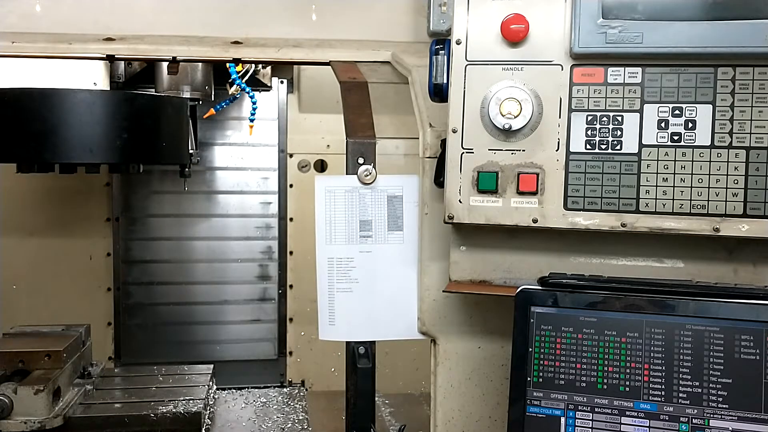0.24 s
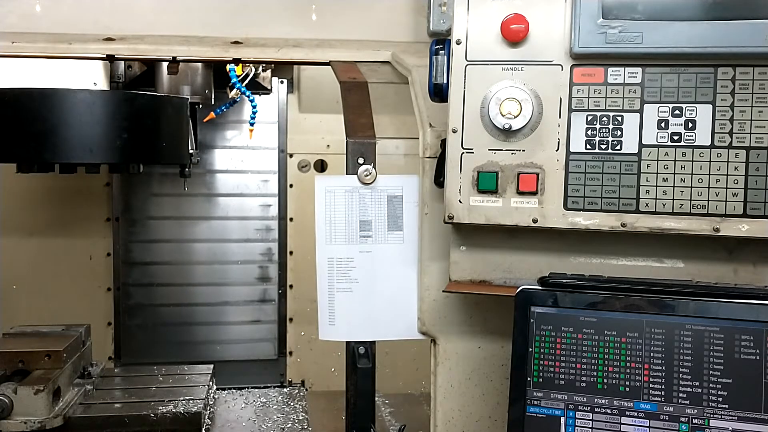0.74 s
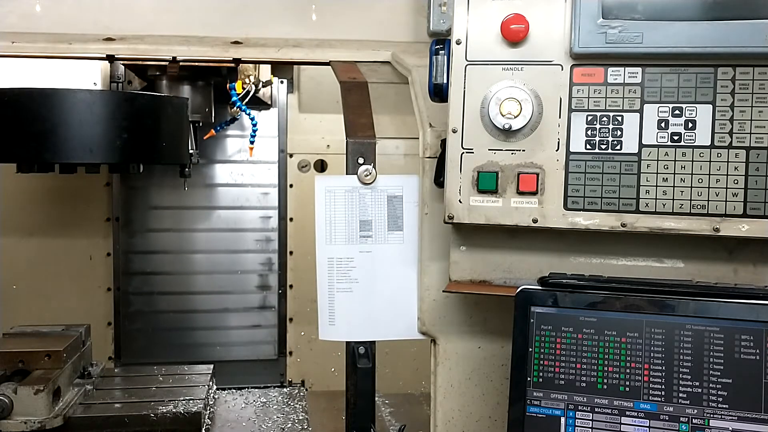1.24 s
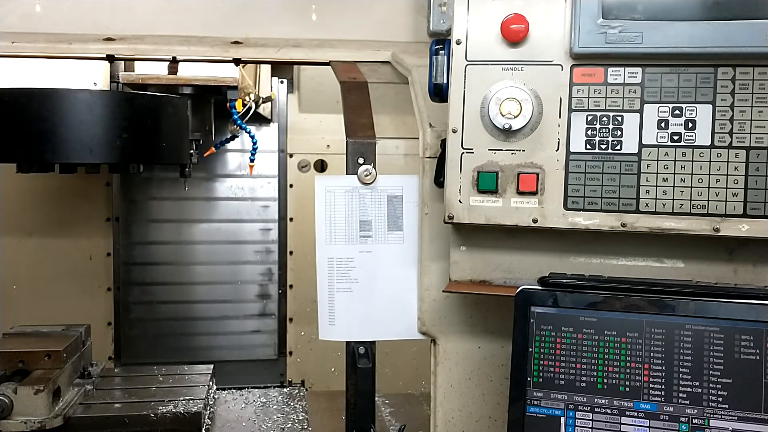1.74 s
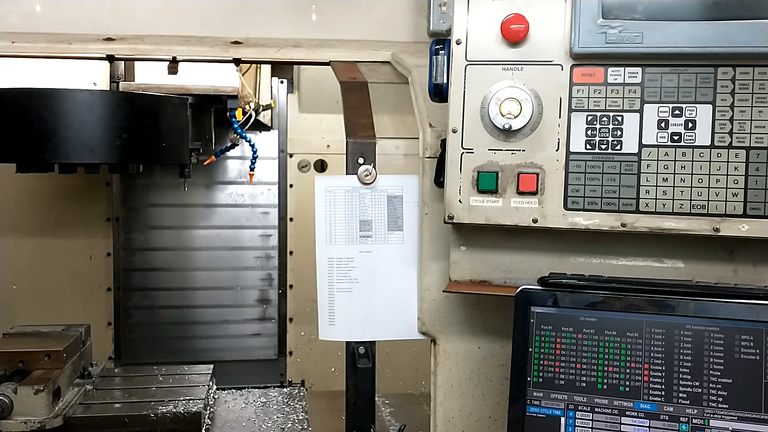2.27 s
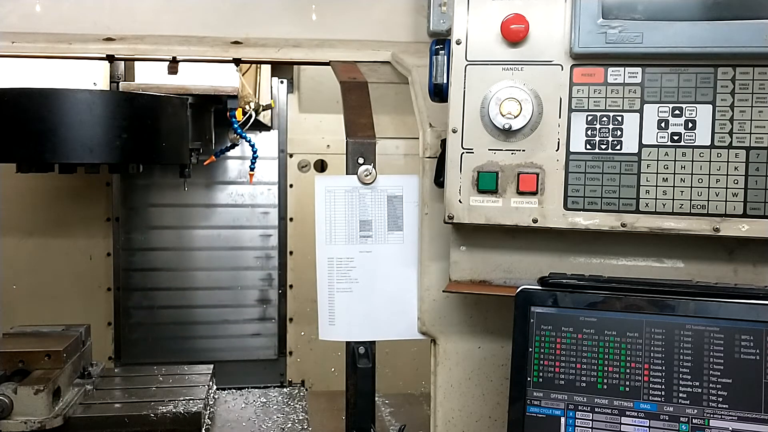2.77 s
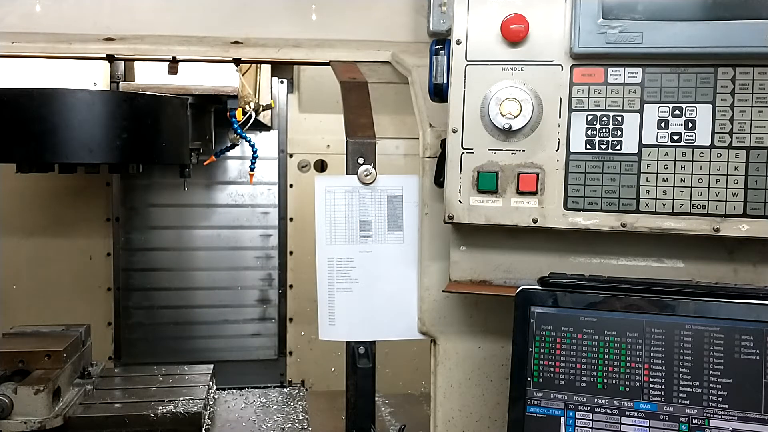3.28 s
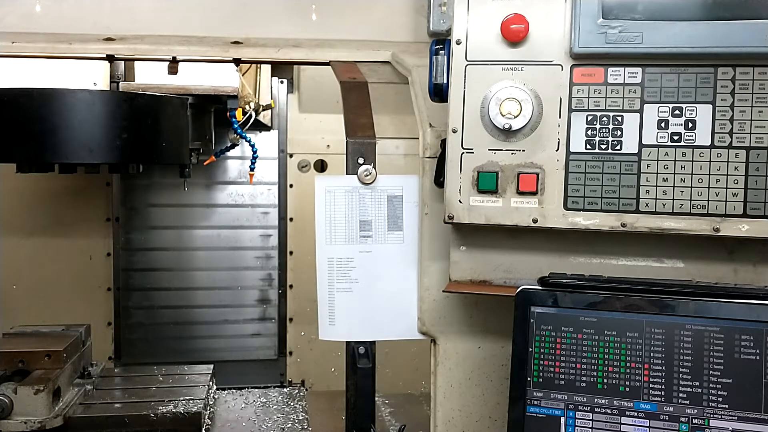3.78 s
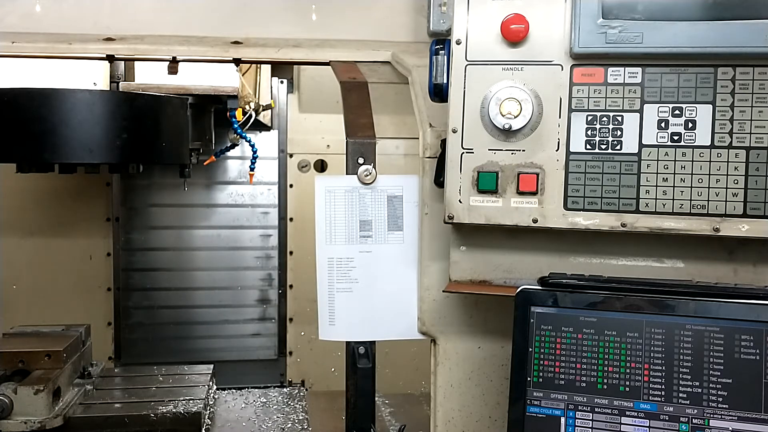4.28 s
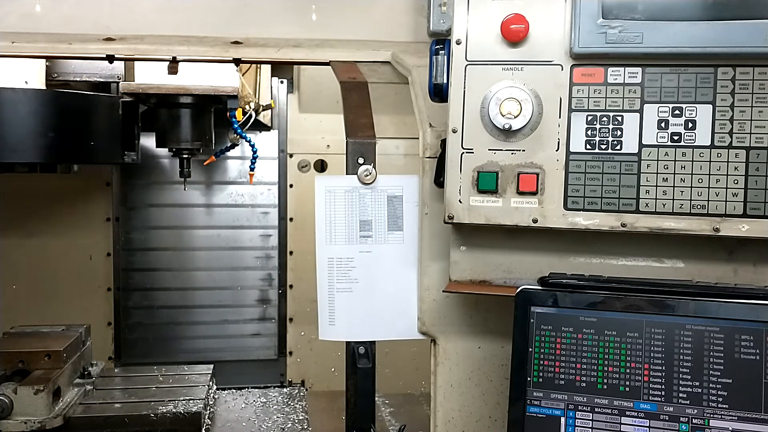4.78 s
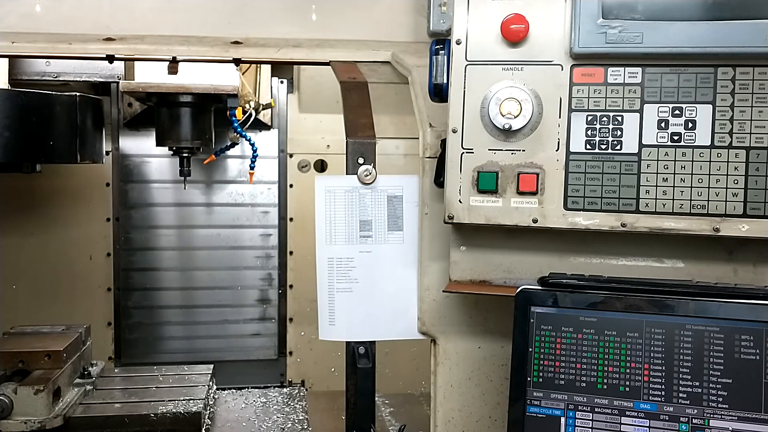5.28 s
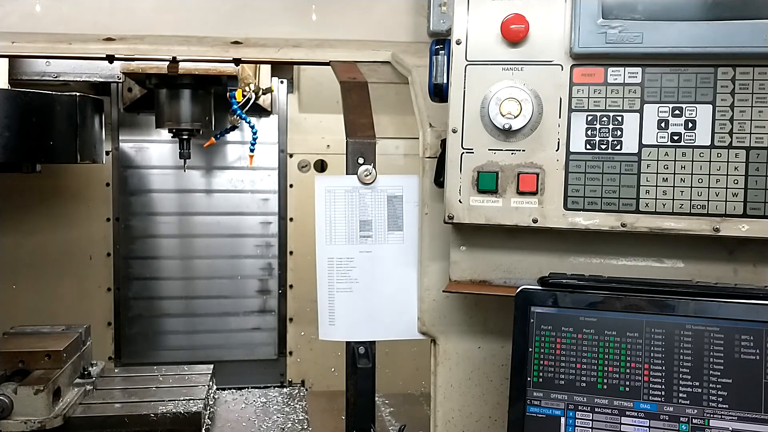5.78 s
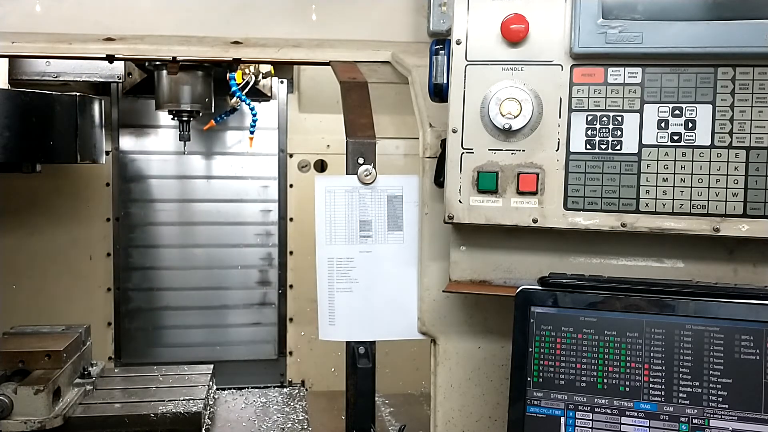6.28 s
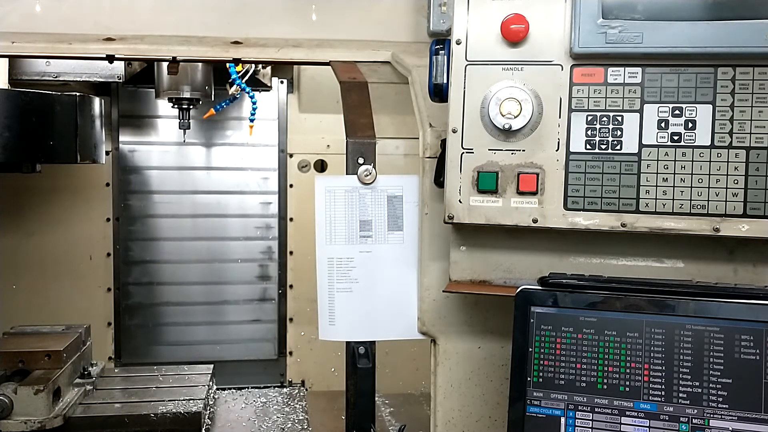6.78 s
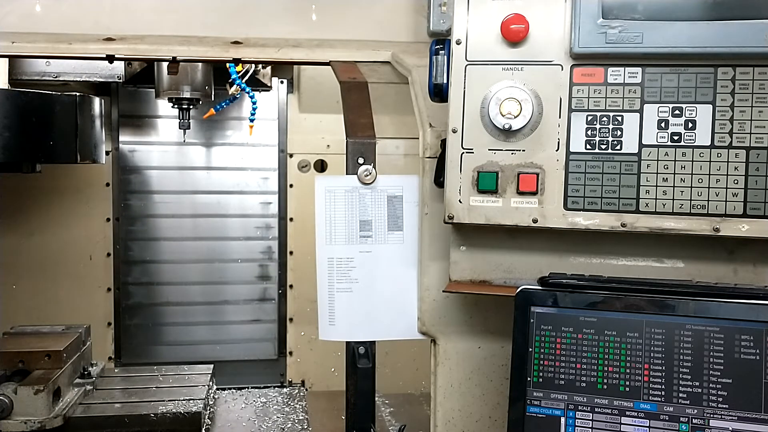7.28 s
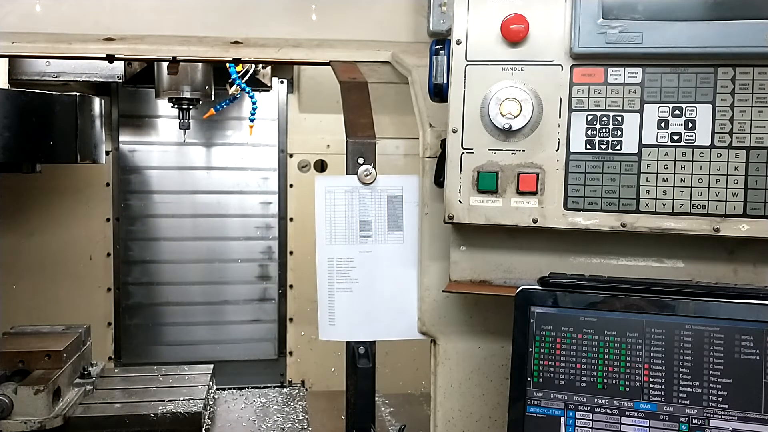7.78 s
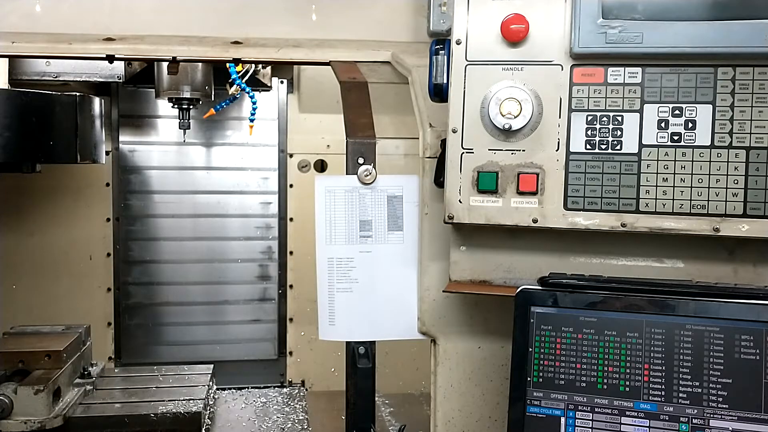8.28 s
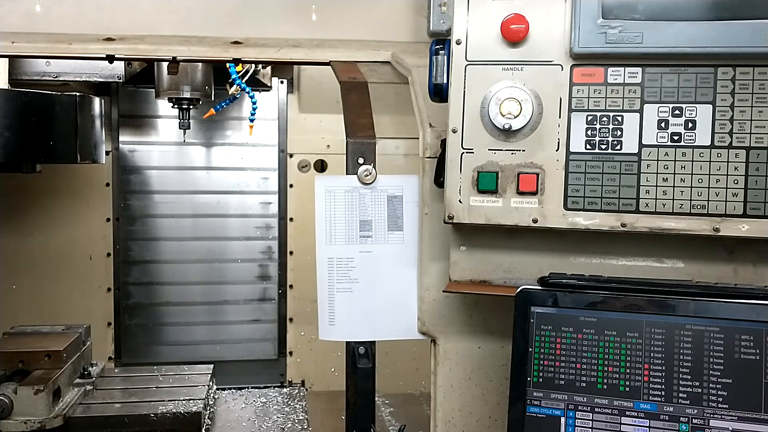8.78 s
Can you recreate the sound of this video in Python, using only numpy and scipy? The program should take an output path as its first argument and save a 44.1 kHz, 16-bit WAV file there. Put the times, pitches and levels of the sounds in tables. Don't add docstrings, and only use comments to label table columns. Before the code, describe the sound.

A machining centre changes its tool, heard by a small stereo microphone in front of its sheet-metal enclosure. From 0 s a very loud, bright, ringing blast of compressed air roars steadily, covering a faint groan of the descending head. Around 1.5-2 s it pinches into wavering whistles, ending in a very high squeal at about 1.95 s. Heavy knocks fall at 2.0-2.3 s, the strongest at 2.24 s with a sharp venting hiss that fades by 3 s. Steady fan and mains hum with soft airy hiss remains. From 4.35 s a carousel rumbles back with faint hiss and a thin reedy singing that rises slightly; a rail bump at 4.85 s, then hard panel clanks and air puffs at 5.1-5.3 s. The head groans and scrapes from 5.3 to 6.8 s, a short bright air puff comes at 6.9 s, then only hum.

```python
import sys
import numpy as np
from scipy import signal
from scipy.fft import rfft, irfft, next_fast_len
from scipy.io import wavfile
from scipy.ndimage import uniform_filter1d, map_coordinates

SR = 44100
rng = np.random.default_rng(int(sys.argv[2]) if len(sys.argv) > 2 else 0)


def master_out(mix):
    frames = np.transpose(np.atleast_2d(mix))
    ceiling = np.clip(frames, -1, 1)
    pcm = np.round(ceiling * 32767).astype(np.int16)
    wavfile.write(sys.argv[1], SR, pcm)


def voltage_ratio(decibels):
    exponent = np.asarray(decibels, float) / 20
    return 10 ** exponent


N = 398220
SIZE = 8 * next_fast_len(N // 8 + 2048)
HZ = np.fft.rfftfreq(SIZE, 1 / SR) + 1e-3
TIME = np.arange(N) / SR

# rise_s, bend of the fade
SURGE = (0.022, 0.5)


def spindle_air():
    # pitch_hz, level_db (per Hz)
    blast_air = [(290, -67), (500, -37), (667, -30), (782, -22), (916, -11), (1310, -10.5), (2030, -10.5),
                 (2450, -10), (2700, -6.5), (3120, -6), (4810, -6.5), (6610, -10.5), (7800, -7.5),
                 (9340, -6), (10700, -7), (11800, -12.5), (13600, -13), (14600, -7), (15100, -12),
                 (15700, -34.5)]
    closing_air = [(290, -54), (500, -24), (603, -24), (677, -9), (1110, -10), (1450, -1.5), (2480, -14.5),
                   (2820, -1.5), (3400, -18.5), (4700, -17), (5480, -6), (6700, -12.5), (11400, -4),
                   (12500, -2), (15700, -6)]
    # pitch_hz, width_hz, level_db
    taper = [(1070, 60, -30), (2582, 23, 3), (2733, 22, 7), (2850, 29, -9.5), (2940, 16, 3), (3460, 22, 5),
             (3565, 25, 4), (3680, 25, 3.5), (4170, 57, -8), (4370, 18, -5.5), (4780, 120, -4.5),
             (8400, 200, -10), (9250, 60, -8), (9460, 200, -11)]
    # start_s, held_s, level_db, fade_s (by 20 dB), extra_brightness_db
    blast_openings = [
        (0.0, 0.27, -24.5, 0.5, 0),
        (0.001, 1.76, -18, 0.0851, -0.5),
        (1.6, 0.16, -43, -0.1851, 14),
    ]
    closing_openings = [
        (1.77, 0.045, -26, 0.11, -0.5),
        (1.86, 0.048, -28.5, 0.0428, 8.5),
        (1.92, 0.07, -33, 0.1349, 2),
        (2.04, 0.039, -57, 0.25, 6),
    ]
    # start_s, pitch_hz, level_db
    gap_low = [(1.15, 934, -42), (1.45, 944, -35.5), (1.58, 904, -35), (1.68, 860, -40.5),
               (1.9, 813, -44.5)]
    gap_mid = [(1.55, 6130, -29), (1.714, 5870, -16), (1.8, 5530, -32.5), (2.15, 5310, -50)]
    gap_high = [(1.72, 13500, -45), (1.76, 13500, -29), (1.846, 13500, -40), (1.886, 13700, -21),
                (1.9, 13700, -33.5)]
    gap_shut = [(1.925, 12800, -30), (1.945, 12700, -10.5), (1.975, 12750, -15.5), (2.03, 12800, -25),
                (2.07, 12690, -38), (2.2, 12697, -68)]

    colour = voltage_ratio(over_hz(blast_air[:-1] + [(16000, -11.0)])) * (1 + 1.83 * peaks(taper))
    blast = jet(blast_openings, "blast", colour, spread=0.65)

    echo_db, echo_lag_s, descent_from_s, shrink_per_s = -15, 0.0007, 0.66, 0.5
    end = 2 * SR
    descent_s = np.maximum(TIME[:end] - descent_from_s, 0)
    late = (TIME[:end] - echo_lag_s * np.exp(-shrink_per_s * descent_s)) * SR
    echo = np.array([map_coordinates(port[:end], [late], mode="mirror") for port in blast])
    blast[:, :end] += voltage_ratio(echo_db) * echo

    closing = jet(closing_openings, "closing", voltage_ratio(over_hz(closing_air)), spread=0.76)
    whistles = whistle(gap_low, 110, 1.3) + whistle(gap_mid, 450, -2.5)
    whistles += whistle(gap_high, 237, -4) + whistle(gap_shut, 180, -2.5)
    return blast + closing + whistles


def vents():
    # pitch_hz, level_db (per Hz)
    clamp_air = [(290, -41), (500, -11), (658, 16), (782, -9), (865, -7), (1030, -12), (1410, -5),
                 (1680, -12), (2240, -0.5), (3400, -7), (4000, 1.5), (5600, -0.5), (7100, 3.5), (9610, 3.5),
                 (11000, -5), (15700, -13)]
    last_air = [(290, -41), (500, -15.5), (840, -21), (1280, -18), (1660, 1), (1860, -14), (2950, -10.5),
                (3210, -20), (3660, -10), (6150, -18), (8320, -7.5), (10000, -13.5), (15700, -24)]
    # start_s, held_s, level_db, fade_s (by 20 dB), extra_brightness_db
    clamp_openings = [
        (2.236, 0.049, -32.5, 0.21, -1.5),
        (2.238, 0.013, -33, 0.09, 6),
        (2.42, 0.12, -55, 0.43, 5.5),
    ]
    last_openings = [
        (4.585, 0.008, -49.5, 0.23, -2),
        (6.857, 0.031, -51.5, 0.11, 14.5),
        (6.897, 0.017, -39, 0.12, 1.5),
        (6.95, 0.014, -67, 0.5, 10),
    ]
    # start_s, pitch_hz, level_db
    clamp_sing = [(2.3, 12400, -52), (2.36, 12350, -37), (2.43, 12250, -38), (2.48, 12300, -52)]

    clamp = jet(clamp_openings, "clamp", voltage_ratio(over_hz(clamp_air)), spread=0.55)
    last = jet(last_openings, "last", voltage_ratio(over_hz(last_air)))
    return clamp + last + whistle(clamp_sing, 400, 0)


def cylinder():
    # pitch_hz, level_db (per Hz)
    stroke_air = [(290, -34), (500, 1), (828, -6.5), (1010, -17), (1780, -10.5), (2900, -4), (3500, -19),
                  (5200, -22), (7210, -5), (14400, -21), (15700, -19)]
    cushion_air = [(290, -31), (500, -1), (697, -7), (793, 0), (957, -19), (1590, -14), (1880, -6.5),
                   (2500, -15), (3030, 1), (3350, -7), (3700, -3), (4200, -20), (5640, -12), (9480, -11),
                   (15700, -41)]
    # start_s, held_s, level_db, fade_s (by 20 dB), extra_brightness_db
    stroke_openings = [
        (4.3, 0.04, -61, 0.1, -4),
        (4.345, 0.05, -55, 0.1, -2),
        (4.4, 0.03, -57, 0.12, 8),
        (4.42, 0.67, -57, 0.1, 2.5),
        (4.586, 0.015, -47, 0.13, 3),
    ]
    cushion_openings = [
        (5.082, 0.03, -41, 0.14, -2),
        (5.16, 0.03, -46, 0.06, 1),
        (5.185, 0.03, -37, 0.17, -2),
    ]
    # start_s, pitch_hz, level_db
    seal = [(4.355, 885, -60), (4.4, 915, -54), (4.47, 931, -55), (4.72, 928, -53), (4.86, 941, -54),
            (5.06, 959, -55), (5.2, 964, -55), (5.29, 962, -63)]
    # multiple of the pitch, level_db
    seal_orders = [(2, -8), (3, -15), (4, -18), (6, -5), (7, -10), (8, 0), (9, -10), (10, 2), (11, -14),
                   (12, -10), (13, -15), (14, -11), (15, -14), (16, -12)]
    # pitch_hz, width_hz, level_db
    barrel = (1915, 60, 13)

    stroke = jet(stroke_openings, "stroke", voltage_ratio(over_hz(stroke_air)))
    cushion = jet(cushion_openings, "cushion", voltage_ratio(over_hz(cushion_air)))

    seal_gain_db, jitter, patchy_db = 3.5, 0.0008, 1.6
    (hz, seal_db), gate = play(seal)
    on, stack = gate > 0, np.zeros((2, N))
    turn = 2 * np.pi * np.cumsum(hz * (1 + jitter * walk(60)))[on] / SR
    barrel_hz, barrel_width_hz, barrel_db = barrel
    lift = voltage_ratio(barrel_db) / np.sqrt(1 + (2 * (2 * hz - barrel_hz) / barrel_width_hz) ** 2)
    port_phase = np.array([[0.5], [-0.5]])
    for order, db in seal_orders:
        size = gate * voltage_ratio(db + seal_db + patchy_db * walk(18))
        if order < 3:
            size = size * lift
        stack[:, on] += size[on] * np.sin(order * turn + 2 * np.pi * rng.random() + port_phase)
    return voltage_ratio(-1.5) * (stroke + cushion) + voltage_ratio(seal_gain_db) * stack


def head():
    # start_s, held_s, level_db, fade_s (by 20 dB)
    screw = [
        (0.66, 1.2, -50, 0.2), (1.87, 0.11, -41.5, 0), (2.07, 0.066, -38.5, 0.4),
        (5.3, 1.35, -44.5, 0.21), (5.45, 0.03, -49, -1.5), (5.6, 0.02, -43, -0.7),
        (6.1, 0.094, -39.5, 0.8), (6.3, 0.06, -51, -0.16), (6.67, 0.019, -42, 0.17),
        (6.77, 0.02, -49, 0.3),
    ]
    slide = [
        (0.6, 1.9, -49.5, 0.8),
        (5.33, 1.28, -45.5, 0.7),
        (5.75, 0.89, -49.5, 0.3),
        (5.9, 0.24, -51, 0.2),
        (6.42, 0.21, -49.5, 0.1),
    ]
    # pitch_hz, width_hz, level_db
    column = [(654, 40, -5), (677, 38, 3), (755, 297.3, -12.5), (836, 28, -3)]
    covers = [(926, 350, -19), (1504, 160, 2), (1678, 32, 9), (1790, 80, -2), (2020, 55, 4),
              (2340, 400, -9), (2690, 300, -7.5)]

    white = field(0.35, 0.8)
    groan = puffs(screw, *SURGE) * voltage_ratio(2.0 + 1.3 * walk(12)) * noise(peaks(column) ** 2, white)
    scrape = puffs(slide, *SURGE) * voltage_ratio(0.5 * walk(12)) * noise(peaks(covers), white)
    return groan + scrape


def carousel():
    # start_s, held_s, level_db, fade_s (by 20 dB)
    roll = [
        (4.33, 0.46, -50, -0.5),
        (4.38, 0.03, -44.5, 0.2),
        (4.71, 0.054, -40.5, 1.5),
        (4.84, 0.0164, -52, -1),
        (5.13, 0.096, -39, 2.2),
    ]
    rails = peaks([(121, 44, -0.79), (188, 27, -1.7)]) ** 2
    return puffs(roll, *SURGE) * voltage_ratio(-1.5) * noise(rails, field(0.12, 2.6))


def knocks():
    # start_s, frame_pitch_hz, frame_db, panel_db, push_s
    hits = [(2.015, 145, -32, -44.5, 0.018), (2.045, 148, -37, -25.5, 0.031),
            (2.07, 178, -26.5, -45, 0.0099), (2.235, 106.3, -24, -17, 0.0026),
            (2.26, 108.3, -29, -27, 0.028), (2.315, 107.7, -22.5, -31.5, 0.04), (4.4, 152, -45.5, -36, .02),
            (4.85, 140, -35, -40, 0.0074), (5.191, 169, -28, -16.5, 0.033),
            (5.209, 175.6, -26, -25.5, 0.019), (5.23, 163, -41, -22, 0.011), (5.262, 158, -38, -27, 0.027)]
    # multiple of the pitch, level_db, t60_s
    frame_modes = [(1, 5.5, 0.18), (1.35, -7, .15), (1.85, -5.5, 0.21)]
    # pitch_hz, level_db, t60_s
    panel_modes = [(430, -10, 0.13), (477, 5, 0.066), (608, -3, 0.15), (710, -0.5, 0.064), (873, 1, 0.072),
                   (1163, -11, 0.066), (1465, -3.5, 0.1), (1700, -38, 0.093), (3023, -12, .03),
                   (3650, -4, 0.031)]

    out, t = np.zeros(N), np.arange(16000) / SR
    for start_s, pitch_hz, frame_db, panel_db, push_s in hits:
        frame, panel = np.zeros(len(t)), np.zeros(len(t))
        for multiple, db, t60 in frame_modes:
            frame += voltage_ratio(db - 60 * t / t60) * np.sin(2 * np.pi * multiple * pitch_hz * t)
        frame *= 1 - np.exp(-t / push_s)

        for hz, db, t60 in panel_modes:
            struck_db = db + 0.94 * rng.standard_normal()
            panel += voltage_ratio(struck_db - 60 * t / t60) * np.sin(2 * np.pi * hz * t)
        force = rng.standard_normal(4000) * np.exp(-t[:4000] / push_s)
        panel = signal.fftconvolve(panel, force)[:len(t)]

        hit = voltage_ratio(frame_db) * frame / abs(frame).max() + voltage_ratio(panel_db) * panel / abs(panel).max()
        out[int(start_s * SR):][:len(t)] += hit
    return out


def shop():
    # pitch_hz, level_db (per Hz)
    room_air = [(15, -46), (25, -14.5), (108, -4), (223, -9.5), (277, -4.5), (335, -17), (503, -10),
                (545, -18), (607, -15), (714, -16.5), (1020, -19), (2610, -27.5), (3430, -31.5),
                (8830, -32), (16000, -74)]
    # pitch_hz, width_hz, level_db
    fan_hiss = [(2580, 580, 1), (5140, 420, -1.5), (8670, 2460, -0.5), (12860, 600, -3.5),
                (15200, 1500, -15)]
    # multiple of the base pitch, level_db
    blade_orders = [(1, -49), (2, -55.5), (3, -63), (4, -81), (5, -70)]
    mains_orders = [(1, -58.5), (2, -77), (3, -66), (4, -70), (5, -71), (6, -60), (7, -66.5), (8, -88),
                    (11, -71.5)]
    blade_hz, mains_hz, air_db, hiss_db = 275.8, 119.6, -46.5, -58

    air, colour, white = np.zeros((2, N)), voltage_ratio(over_hz(room_air)), field(0.49, 0.84, step=1)
    for low in 20 * 4.0 ** np.arange(5):
        band = colour * (HZ > low) * (HZ < 4 * low)
        air += np.sqrt(np.sum(band ** 2)) * voltage_ratio(0.96 * walk(2.0)) * noise(band, white)

    tones = np.zeros((2, N))
    for base_hz, orders in ((blade_hz, blade_orders), (mains_hz, mains_orders)):
        for order, db in orders:
            drift = 2 * np.pi * rng.random() + 0.18 * walk(7.6) + np.array([[0.3], [-0.3]])
            level = voltage_ratio(db + 3.5 + 1.35 * walk(7))
            tones += level * np.sin(2 * np.pi * order * base_hz * TIME + drift)

    hiss = voltage_ratio(hiss_db) * noise(peaks(fan_hiss) ** 2, field(0.24, 0.49, step=1))
    return unit(air) * voltage_ratio(air_db) + tones + hiss


def jet(rows, valve, colour, spread=0.36):
    edges_hz = (750, 2000, 5000, 11000, 15740)
    # rise_s, bend of the fade (1 straight, 2 a tank that runs empty), flutter_db
    valves = dict(blast=(.002, 1.3, .3), closing=(.02, 1.3, .52), clamp=(.011, 1.9, .27),
              stroke=(.005, 1.1, .5), cushion=(.008, 1.1, .8), last=(.004, 1.0, .34))
    # level_db (against 2-5 kHz), stretch of the fade, share of the brightness
    parts = dict(blast=[(-19, 1.3, 0.), (-1, 1.4, 0.93), (-10, 1.12, 1.2)], closing=[(-12, 2, 0.),
             (5, 1.15, 0.3), (-5.5, 0.75, 1.4)], clamp=[(-10.5, 1.1, 1.4), (7, 0.99, 0.14),
             (-2, 0.94, -.4)], stroke=[(-0.5, 1.03, 0.18), (5.5, 0.48, 0.67), (-8, .75, 1.3)],
             cushion=[(-1, 1.6, 2.7), (-2.5, 0.8, 1.1), (-17, 0.72, 1.2)], last=[(-1, 0.95, -0.41),
             (3, 1, 0.93), (-17, 0.98, 0.97)])

    rise_s, bend, flutter_db = valves[valve]
    low, high, top = parts[valve]
    out, shared, white = np.zeros((2, N)), walk(14), field(0.31, spread)
    above = [np.clip(0.5 + np.log(HZ / edge) / 0.25, 0, 1) for edge in edges_hz]
    above[-1] = HZ > edges_hz[-1]
    for i, (rel_db, stretch, share) in enumerate((low, (0, 1, 0), high, top)):
        gain = puffs(rows, rise_s, bend, stretch, share)
        on = gain > 0
        part_db = 2 + rel_db + flutter_db * (shared + walk(30))
        part = noise(colour * (above[i] - above[i + 1]), white)
        out[:, on] += gain[on] * voltage_ratio(part_db[on]) * part[:, on]
    return out


def whistle(table, width_hz, gain_db):
    (hz, db), gate = play(table)
    return gate * voltage_ratio(db + gain_db) * wavering(hz, width_hz)


def wavering(hz, width_hz):
    a, b, c, d = (walk(width_hz) for _ in range(4))
    common, own = a + 1j * b, 0.77 * (c + 1j * d)
    carrier = np.exp(2j * np.pi * np.cumsum(hz) / SR)
    return unit(np.real(np.array([common + own, common - own]) * carrier))


def puffs(rows, rise, bend, stretch=1, share=0):
    power = np.zeros(N)
    for start, held, db, fade, *bright_db in rows:
        fade = max(fade, 0.02)
        end = start + rise + held + 3 * fade * stretch
        on = slice(max(int(start * SR), 0), int(end * SR))
        age = np.maximum(TIME[on] - start, 0)
        gone = np.maximum(age - rise - held, 0) / (fade * stretch)
        level_db = db + share * sum(bright_db) - 20 * gone ** bend
        power[on] += (np.minimum(age / rise, 1) * voltage_ratio(level_db)) ** 2
    return np.sqrt(power)


def play(table):
    s, *columns = np.transpose(table)
    gate = np.clip(np.minimum(TIME - s[0] + 0.004, s[-1] - TIME) / 0.004, 0, 1)
    return [np.interp(TIME, s, column) for column in columns], gate


def walk(rate):
    levels = uniform_filter1d(rng.standard_normal(int(20 * rate) + 8), size=2)
    return np.interp(TIME * 2 * rate, np.arange(len(levels)), levels) * 1.7


def unit(x):
    return x / np.sqrt(np.mean(x ** 2))


def over_hz(points):
    hz, value = np.transpose(points)
    return np.interp(np.log(HZ), np.log(hz), value)


def peaks(modes):
    return np.sqrt(sum(voltage_ratio(2 * db) / (1 + (2 * (HZ - hz) / w) ** 2) for hz, w, db in modes))


def noise(gain, white):
    step = len(HZ) // (white.shape[1] - 1)
    return np.tile(unit(irfft(gain[::step] * white)), step)[:, :N]


def field(t60, spread, step=4):
    mid, side, point = rng.standard_normal((3, 2 * len(HZ[::step]))).view(complex)
    return spread * ports(mid, side, step) + point * reflections(t60, step)


def reflections(t60, step):
    t = np.arange(16384) / SR
    mid, side = rfft(rng.standard_normal((2, len(t))) * voltage_ratio(-60 * t / t60), SIZE // step)
    return ports(mid, side, step) / np.sqrt(np.mean(abs(mid) ** 2))


def ports(mid, side, step):
    # pitch_hz, likeness (0-1)
    likeness = [(60, 1), (130, 1), (290, 0.87), (640, 0.52), (1410, 0.04), (3100, 0), (6820, -0.12),
                (15000, 0.0)]
    alike = np.clip(over_hz(likeness)[::step], 0, 1)
    mid, side = mid * np.sqrt(1 + alike), side * np.sqrt(1 - alike)
    return np.array([mid + side, mid - side])


def enclosure(x, t60, direct):
    paths = direct + (1 - direct) * reflections(t60, step=1)
    return irfft(rfft(x, SIZE) * paths, SIZE)[:, :N]


def scene():
    air = spindle_air() + vents() + cylinder()
    metal = head() + carousel() + enclosure(knocks(), 0.15, 0.43)
    return air + metal + shop()


def low_pass(x):
    return signal.sosfilt(signal.butter(12, 16600, fs=SR, output="sos"), x)


def record(dry):
    # pitch_hz, level_db
    lean_points = [(60, -5.5), (110, 2), (200, -4.5), (380, -1.5), (700, -0.5), (1290, 2.5), (2380, 0.5),
                   (4400, 3.5), (8120, -1), (15000, -2)]
    port_lag_s = 0.0001
    lag = np.exp(1j * np.pi * port_lag_s * HZ * np.exp(-HZ / 2000))
    lean = voltage_ratio(over_hz(lean_points) / 2) * lag
    edges = (HZ < 15740) / np.sqrt(1 + (48 / HZ) ** 8)
    heard = irfft(rfft(dry, SIZE) * edges * np.array([lean, 1 / lean]), SIZE)[:, :N]
    mix = np.clip(heard, -1, 1)
    return low_pass(mix)


dry = scene()
out = record(dry)
master_out(out)
```